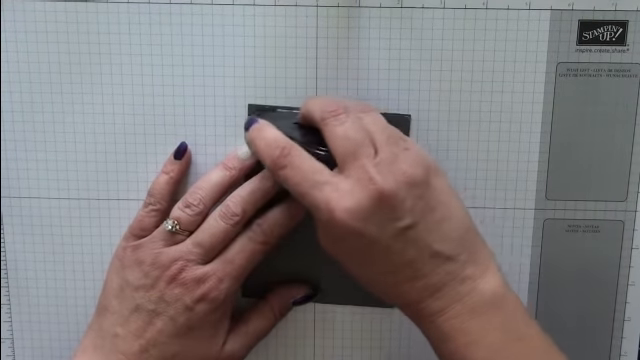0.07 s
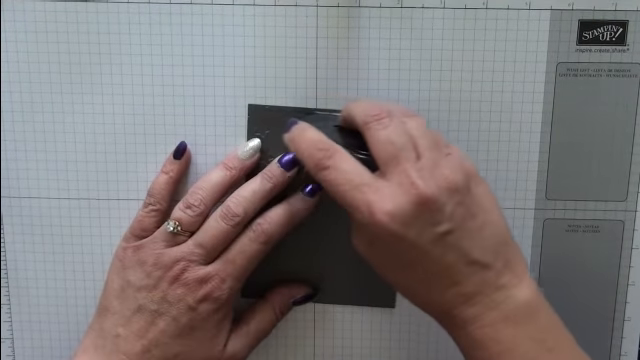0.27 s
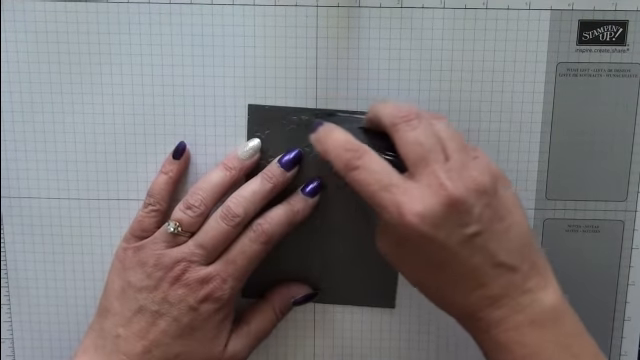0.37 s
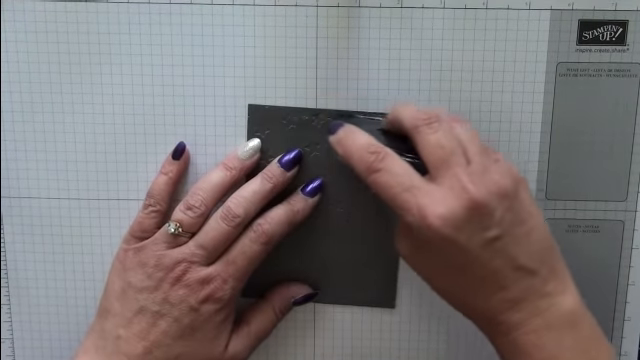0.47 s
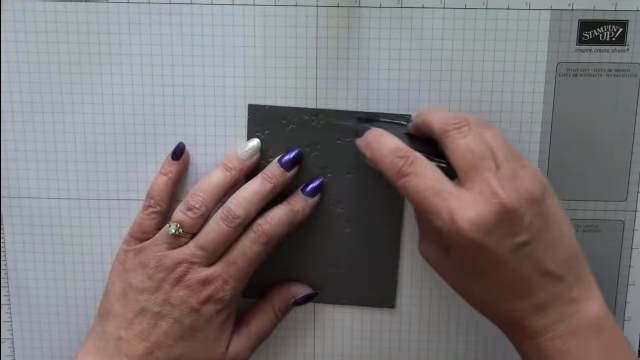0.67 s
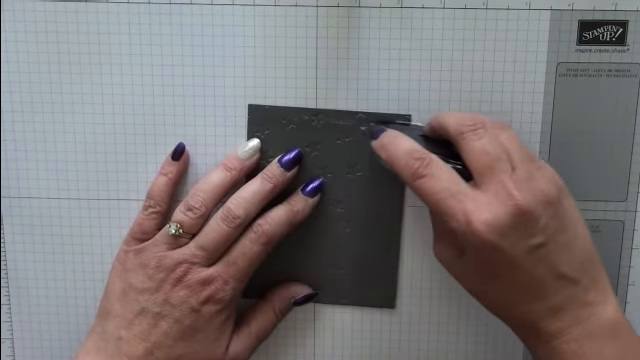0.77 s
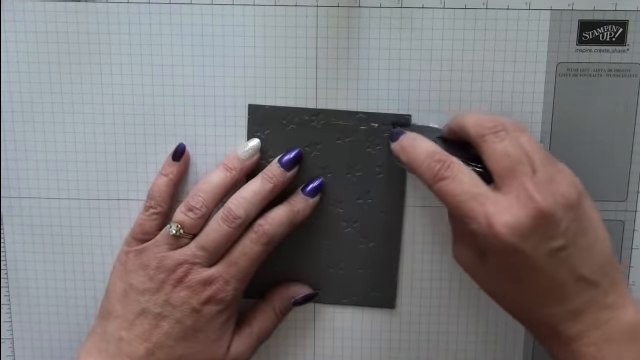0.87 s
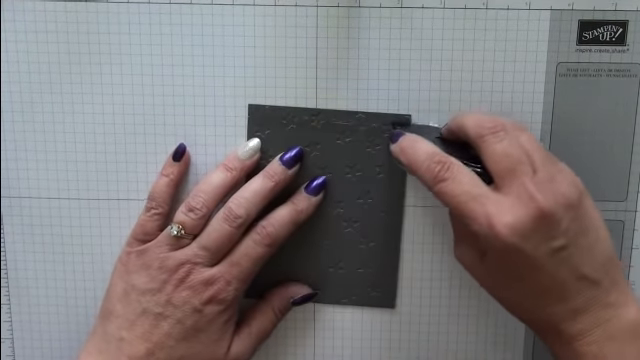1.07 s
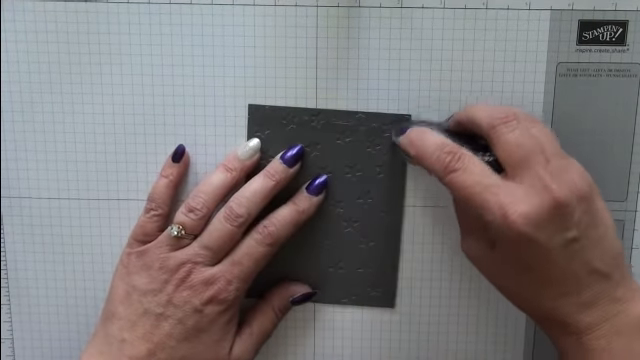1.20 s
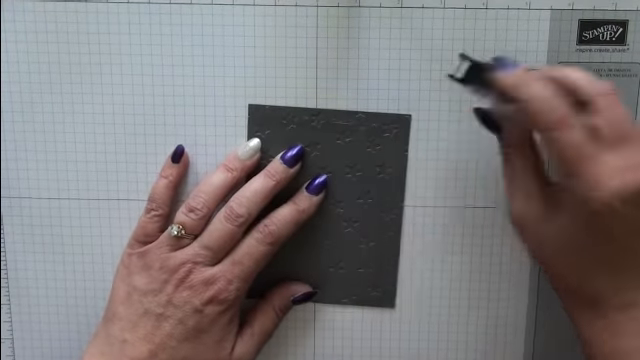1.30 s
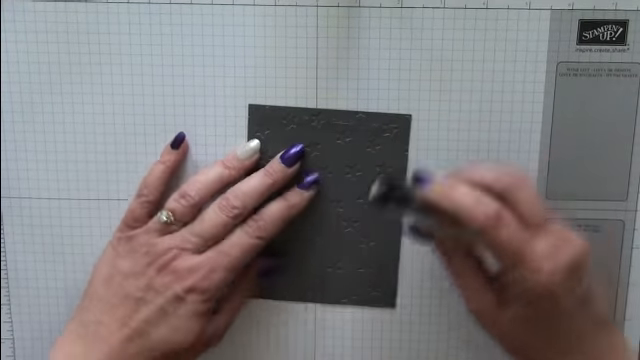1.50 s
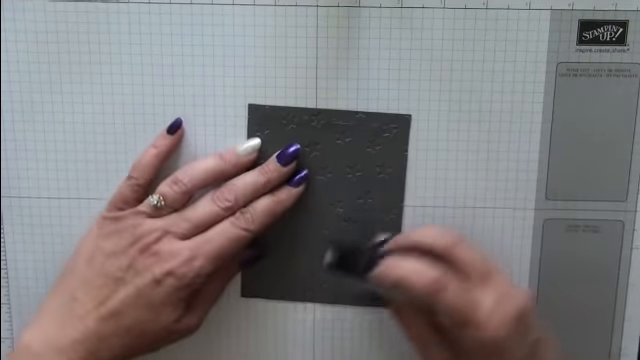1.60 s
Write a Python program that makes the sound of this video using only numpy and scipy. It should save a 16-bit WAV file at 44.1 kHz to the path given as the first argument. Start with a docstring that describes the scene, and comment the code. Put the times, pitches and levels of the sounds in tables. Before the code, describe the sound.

A plastic tape runner is drawn along a paper card on a desk, close up in a small, quiet room. Light taps and soft finger bumps come first. From 0.2 to 1 second the tape crackles and the ratchet clicks rapidly, slowing midway and speeding up again. The lifted tool gives one sharp clack at about 1.3 seconds, and a hand slides softly off the paper around 1.6 seconds.

```python
"""A hand-held adhesive tape runner is drawn along a paper card on a desk in a small room.
First the plastic case is set down and gripped with light taps, and fingers bump the desk.
From 0.2 to 1 s tape crackles off the reel while the ratchet snaps tooth by tooth, ringing the case.
The hand shifts, the lifted tool gives one sharp clack at 1.34 s, and the hand slides off the paper."""
import sys
import numpy as np
from scipy import signal
from scipy.fft import rfft, irfft
from scipy.io import wavfile

SR = 44100
rng = np.random.default_rng(int(sys.argv[2]) if len(sys.argv) > 2 else 0)


def put_to_file(sound):
    """Save the sound as 16-bit audio at rate SR, in the file named by the first command-line argument."""
    columns = np.atleast_2d(sound).T  # one column per channel
    safe = np.clip(columns, -1, 1)
    whole_steps = np.round(safe * 32767)
    wavfile.write(sys.argv[1], SR, whole_steps.astype(np.int16))


N = 72765
TIME = np.arange(N) / SR

# ratchet teeth: t/s, tip tick/dB, snap/dB, case ring/dB
RATCHET_TEETH = [(0.2461, -11, -8.5, -12.5), (0.2768, -19, -6.5, -13.5), (0.2966, -9, -8, -17),
                 (0.3169, -14, -3.5, -6), (0.337, -9.5, -5.5, -5), (0.3546, -25, -11.5, -3.5),
                 (0.3734, -23, -4, -3.5), (0.392, -11, -5, -4), (0.4102, -9, -2.5, -32),
                 (0.4296, -4, -5, -4.5), (0.4487, -7, -4.5, -5), (0.4673, -8, -2.5, -13),
                 (0.4871, -8, -5.5, -5.5), (0.509, -10, -5, -18), (0.5279, -9, -10, -10),
                 (0.5496, -12, -7, -8.5), (0.5764, -10, -7.5, -4), (0.6048, -10, -8.5, -6.5),
                 (0.6278, -9, -14.5, -24), (0.6629, -10.5, -11.5, -11.5), (0.7003, -12, -13.5, -7),
                 (0.74, -10.5, -13.5, -10.5), (0.783, -9, -12.5, -16.5), (0.8217, -9, -9, -24),
                 (0.855, -7, -6.5, -11), (0.8835, -7, -6, -22), (0.905, -6, -8, -21),
                 (0.924, -5.5, -1.5, -28), (0.942, -13, -4, -0.5), (0.9648, -9, -3.5, -7.5),
                 (1.0052, -14.5, -7.5, -13)]
# pawl modes: f/Hz, level/dB, t60/s
PAWL_MODES = [(3146, -3.5, 0.018), (3368, -5.5, 0.026), (3665, -5.5, 0.031), (4663, -2.5, 0.013)]
# peeling envelope: t/s, level/dB
PEEL_ENVELOPE = [(.16, -70), (.19, -61.5), (.243, -54), (.255, -36), (.45, -35.5), (.60, -37.5), (.68, -41),
                 (.79, -43.5), (.93, -34), (1.03, -43.5), (1.07, -63), (1.15, -69)]


def from_db(db):
    """Decibels to gain."""
    return 10 ** (np.asarray(db) / 20)


def unit_rms(x):
    """Scale to rms 1."""
    return x / np.sqrt(np.mean(x ** 2) + 1e-20)


def at_hz(points, hz):
    """Read a table on a log-frequency axis."""
    f, value = np.transpose(points)
    return np.interp(np.log(np.maximum(hz, 1)), np.log(f), value)


def level(curve):
    """Gain over time from a dB curve; -120 dB outside it."""
    return from_db(np.interp(TIME, *np.transpose(curve), left=-120, right=-120))


def through(x, response):
    """Convolve with an impulse response."""
    return signal.fftconvolve(x, response)[:N]


def butterworth(x, order, cut_hz, kind):
    """Causal low- or high-pass."""
    return signal.sosfilt(signal.butter(order, cut_hz, kind, fs=SR, output="sos"), x)


def coloured(x, spectrum, size=4096):
    """Minimum-phase filter with the given spectrum; unit power gain."""
    gain = unit_rms(from_db(at_hz(spectrum, np.fft.rfftfreq(size, 1 / SR))))
    cepstrum = irfft(np.log(gain))[:size // 2]
    cepstrum[1:] *= 2
    return through(x, irfft(np.exp(rfft(cepstrum, size))))


def clicks(times_s, db):
    """One impulse per event."""
    out = np.zeros(N)
    np.add.at(out, (np.asarray(times_s) * SR).astype(int), from_db(db))
    return out


def bursts(times_s, db, rise_s, fall_s, order=1, spread=0, size=1024):
    """Brief contact chatter per event; db sets its energy, spread varies its length."""
    out = np.zeros(N + size)
    for start, gain in zip((times_s * SR).astype(int), from_db(db)):
        t = TIME[:size] * np.exp(spread * rng.standard_normal())
        shape = (1 - np.exp(-t / rise_s)) ** order * np.exp(-t / fall_s)
        chatter = rng.standard_normal(size)
        for _ in range(3):  # flatten spectrum and envelope in turn
            even = irfft(np.exp(1j * np.angle(rfft(shape * chatter))), size)
            chatter = np.cos(np.angle(signal.hilbert(even)))
        out[start:start + size] += gain * unit_rms(shape * chatter) / np.sqrt(size)
    return out[:N]


def ring(force, modes):
    """Decaying modes of alternating sign, driven by a force."""
    response = sum((-1) ** k * from_db(db - 60 * TIME / t60_s) * np.sin(2 * np.pi * hz * TIME)
                   for k, (hz, db, t60_s) in enumerate(modes))
    return through(force, response)


def gliding(x, curve, width_hz):
    """Resonance whose centre follows a curve; unit power gain."""
    centre_hz = np.interp(TIME, *np.transpose(curve))
    turn = np.exp(2j * np.pi * np.cumsum(centre_hz) / SR)
    r = np.exp(-np.pi * width_hz / SR)
    return np.real(turn * signal.lfilter([np.sqrt(2 * (1 - r * r))], [1, -r], x / turn))


def room_tone():
    """Steady, mostly low background noise."""
    # f/Hz, level/dB
    spectrum = [(20, -4), (60, -12), (105, 3.5), (160, -1), (240, 3), (400, -3.5), (720, -6.5), (845, -0.5),
                (980, -5), (1600, -6), (7000, -17.5), (15000, -22.5)]
    return coloured(rng.standard_normal(N), spectrum)


def case(force, tilt_db_per_octave_s=70, wander_db=3, wander_per_s=25):
    """Plastic case: the shifting grip favours one mode, then another, the upper ones late in the stroke."""
    # f/Hz, level/dB, t60/s
    modes = [(1322, -13.5, 0.067), (1403, -11.5, 0.07), (1486, -6, 0.055), (1532, -6.5, 0.061),
             (1579, -10.5, 0.094), (1668, -5, 0.11), (1697, -17.5, 0.069)]
    start_s, end_s = RATCHET_TEETH[0][0], RATCHET_TEETH[-1][0]
    tilt_db_per_octave = tilt_db_per_octave_s * (np.clip(TIME, start_s, end_s) - (start_s + end_s) / 2)
    centre_hz = np.mean(modes, axis=0)[0]
    knots_s = np.arange(0, N / SR, 1 / wander_per_s)
    rings = 0
    for mode in modes:
        grip_db = np.interp(TIME, knots_s, rng.normal(0, wander_db, len(knots_s)))
        tilt_db = tilt_db_per_octave * np.log2(mode[0] / centre_hz)
        rings = rings + ring(force * from_db(grip_db + tilt_db), [mode])
    return butterworth(rings, 4, 1078, "high")  # little radiation below the modes


def taps(snap_db=3.5, ring_db=-22.5):
    """Light knocks on the case as it is set down and gripped."""
    # t/s, level/dB
    knocks = [(0.039, -29.5), (0.096, -28.5), (0.142, -29.5), (0.169, -26), (.182, -17), (0.208, -20),
              (1.312, -27), (1.457, -30), (1.626, -23)]
    # f/Hz, level/dB
    spectrum = [(800, -8), (1400, 12.5), (1950, 5), (2400, -4), (2900, 11), (4000, -5.5), (7500, -6),
                (14000, -60)]
    times_s, db = np.transpose(knocks)
    contact = bursts(times_s, db + snap_db, rise_s=.0005, fall_s=.0014)
    return coloured(contact, spectrum) + case(clicks(times_s, db + ring_db))


def desk(force):
    """The desk top rings but radiates little deep bass."""
    # f/Hz, level/dB, t60/s
    modes = [(218, -0.5, 0.065), (279.7, -4.5, 0.14), (387, -14, 0.14), (497, -1.5, 0.047),
             (668, -5, 0.052), (728, -8, 0.049)]
    return butterworth(ring(force, modes), 2, 116, "high")


def bumps(push_s=.003, push_db=1.5, rub_db=-80):
    """Soft finger pushes and the faint rub of the pressed tool drive the desk."""
    # t/s, level/dB
    touches = [(0.042, -38.5), (.097, -35.5), (0.193, -38), (0.338, -41.5), (0.655, -43), (0.703, -51),
               (1.048, -44), (1.212, -42.5)]
    times_s, db = np.transpose(touches)
    pulse = np.sin(np.pi * np.minimum(TIME / push_s, 1)) ** 2
    pushes = through(clicks(times_s, db + push_db), pulse / pulse.sum())
    rumble = unit_rms(butterworth(rng.standard_normal(N), 2, 240, "low"))
    rub = from_db(rub_db) * np.sqrt(level(PEEL_ENVELOPE)) * rumble
    return desk(pushes + rub)


def tape(pops_per_s=9000, spread_db=2.5):
    """Adhesive leaves its backing in tiny pops that shake the taut tape, the case and the pawl."""
    # f/Hz, level/dB
    spectrum = [(120, -14.5), (480, -5.5), (630, -9.5), (820, -2), (950, -6), (1500, 1), (2400, 1),
                (3800, 4.5), (6000, 1), (10000, -4.5), (12300, 1), (15500, -10.5)]
    # resonance of the tape under the tip: t/s, f/Hz
    glide = [(.34, 3750), (.42, 3170), (.53, 3330), (.86, 2700)]
    sizes = from_db(spread_db * np.minimum(rng.exponential(1, N), 4))
    signs = rng.choice([-1, 1], N)
    popping = rng.random(N) < pops_per_s / SR
    pops = level(PEEL_ENVELOPE) * unit_rms(sizes * signs * popping)
    tone = from_db(-21) * gliding(pops, glide, width_hz=160)
    ringing = from_db(-37) * case(pops) + from_db(-39) * ring(pops, PAWL_MODES)
    return coloured(pops, spectrum) + tone + ringing


def ratchet(lead_s=.0012, snap_gain_db=1.5, pawl_gain_db=-21.5, case_gain_db=-20):
    """The pawl scrapes up each tooth, ticks off it and lands with a ringing snap; the case answers."""
    # tick of the pawl's tip: f/Hz, level/dB
    tip_spectrum = [(1500, -25), (4000, -8), (6000, 5), (8000, 5.5), (10000, 2), (12500, 6.5), (15500, -14)]
    # f/Hz, level/dB
    snap_spectrum = [(200, -22.5), (500, -14), (900, -12), (1300, 0), (2000, 4.5), (2600, 4), (3300, 4.5),
                     (4200, -5), (4900, 3), (6200, -14.5), (7600, -3.5), (9800, -27), (15500, -29)]
    times_s, tip_db, snap_db, ring_db = np.transpose(RATCHET_TEETH)
    climb_s = times_s - lead_s
    ticks = bursts(climb_s, tip_db, rise_s=.002, fall_s=.0017, order=2, spread=.2)
    snaps = bursts(climb_s, snap_db + snap_gain_db, rise_s=.004, fall_s=.0017, order=2, spread=.2)
    pawl = ring(clicks(times_s, snap_db + pawl_gain_db), PAWL_MODES)
    case_force = bursts(times_s, ring_db + case_gain_db, rise_s=.0015, fall_s=.0014)
    return coloured(ticks, tip_spectrum) + coloured(snaps, snap_spectrum) + pawl + case(case_force)


def slide():
    """Skin hisses over paper: the holding hand shifts, then slides off."""
    # t/s, level/dB
    envelope = [(1.08, -76), (1.2, -58.5), (1.3, -79), (1.535, -69), (1.555, -45.5), (1.6, -52.5),
                (1.65, -48.5)]
    # f/Hz, level/dB
    spectrum = [(300, -11), (1500, -26), (3500, 4), (6500, 8), (9000, 6.5), (12500, 6), (15500, -6)]
    return level(envelope) * coloured(rng.standard_normal(N), spectrum)


def clack(rattle_db=-4.5, desk_db=-6.5):
    """The tool swings off the card: two ticks, then a hard clack with a desk knock; loose parts rattle."""
    # t/s, crack/dB, body/dB
    impacts = [(1.3193, -21, -47), (1.3246, -15.5, -63), (1.3397, -1.5, -21.5)]
    # f/Hz, level/dB
    crack_spectrum = [(80, -32), (250, 5), (700, 3.5), (950, 4), (1400, 7), (2100, -1), (2700, -4),
                      (3500, 2.5), (4400, 10), (5700, 4.5), (8300, 13), (9500, 4.5), (13000, 5.5),
                      (15500, -14)]
    # f/Hz, level/dB
    rattle_spectrum = [(120, -5), (350, 7), (720, 5.5), (950, -6.5), (1800, 6.5), (3400, -11), (4400, 7),
                       (5800, -15), (11000, -6), (15500, -9)]
    # f/Hz, level/dB, t60/s
    loose_part_modes = [(1351, -6.5, 0.027), (1656, -11.5, 0.1), (2730, -3.5, 0.016), (4400, -19, 0.076),
                        (8170, -20, 0.03)]
    times_s, crack_db, body_db = np.transpose(impacts)
    crack = bursts(times_s, crack_db, rise_s=.0006, fall_s=.0011)
    rattle = bursts(times_s, crack_db + rattle_db, rise_s=.0031, fall_s=.024, size=8192)
    blow = clicks(times_s, body_db)
    ringing = ring(blow, loose_part_modes) + from_db(desk_db) * desk(blow)
    return coloured(crack, crack_spectrum) + coloured(rattle, rattle_spectrum) + ringing


def room_tail(onset_s=.0022, size=22050):
    """Diffuse response: half-octave noise bands, each dying at its own rate; unit energy."""
    # f/Hz, t60/s
    decay = [(150, 0.18), (500, 0.29), (1600, 0.27), (4000, 0.22), (8000, 0.28), (15000, 0.11)]
    white = rfft(rng.standard_normal(size))
    hz, t = np.fft.rfftfreq(size, 1 / SR), TIME[:size]
    edges_hz = 84 * 2 ** (np.arange(17) / 2)
    tail = 0
    for low, high in zip(edges_hz, edges_hz[1:]):
        band = white * ((hz >= low) & (hz < high))
        steady = np.cos(np.angle(np.fft.ifft(band, size)))
        t60_s = at_hz(decay, np.sqrt(low * high))
        tail = tail + np.sqrt(high - low) * steady * from_db(-60 * t / t60_s)
    onset = 1 - np.exp(-(t / onset_s) ** 2)
    return unit_rms(tail * onset) / np.sqrt(size)


def scene(tail_mid_db=-4.5, tail_side_db=-11.5, tone_mid_db=-53.5, tone_side_db=-56.5):
    """Sources in the centre; only the room's tail and tone have width."""
    # near reflections: delay/s, level/dB
    reflections = [(.0029, -13), (0.0116, -20)]
    direct = taps() + bumps() + tape() + ratchet() + slide() + clack()
    early = through(direct, clicks(*np.transpose(reflections)))
    mid = direct + early + from_db(tail_mid_db) * through(direct, room_tail())
    side = from_db(tail_side_db) * through(direct, room_tail())
    mid += from_db(tone_mid_db) * room_tone()
    side += from_db(tone_side_db) * room_tone()
    return np.array([mid + side, mid - side])


def record(dry, narrow_below_hz=350, narrow_above_hz=10500, cutoff_hz=16000):
    """Closely spaced microphones: near mono in the bass and top treble; steep top cut."""
    mid, side = (dry[0] + dry[1]) / 2, (dry[0] - dry[1]) / 2
    side = butterworth(side, 1, narrow_below_hz, "high")
    side = butterworth(side, 8, narrow_above_hz, "low")
    top_cut = signal.ellip(10, .1, 80, cutoff_hz, fs=SR, output="sos")
    return signal.sosfilt(top_cut, np.array([mid + side, mid - side]))


dry = scene()
out = record(dry)
put_to_file(out)
```